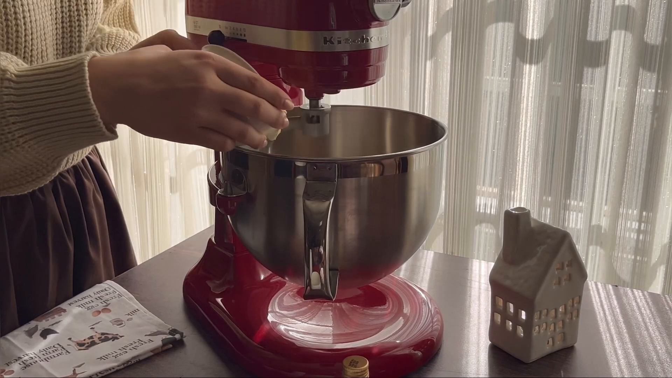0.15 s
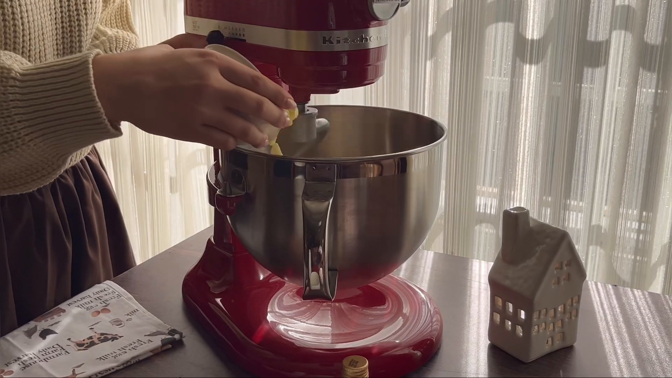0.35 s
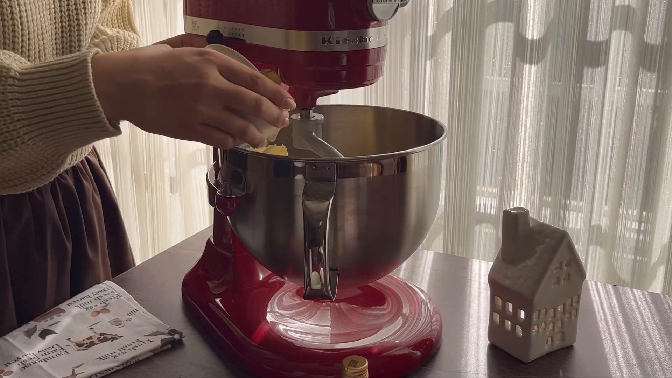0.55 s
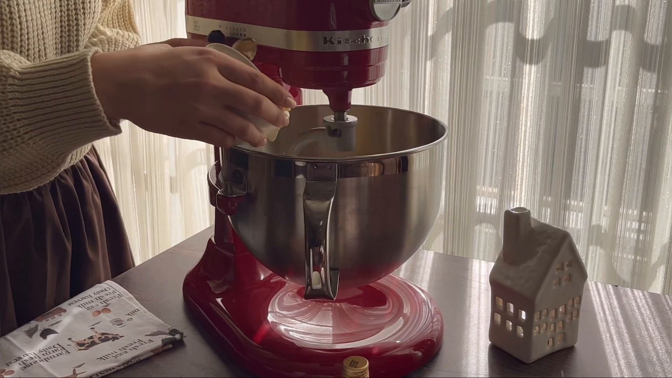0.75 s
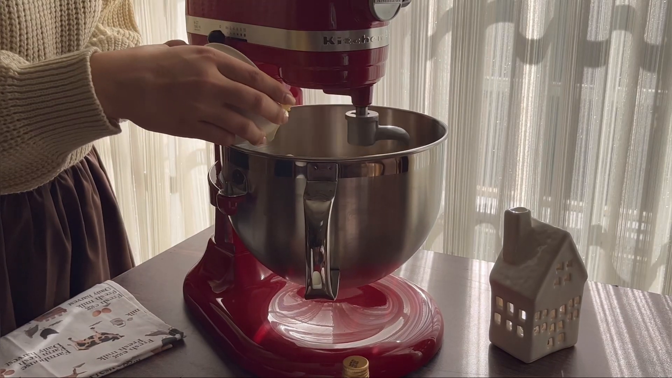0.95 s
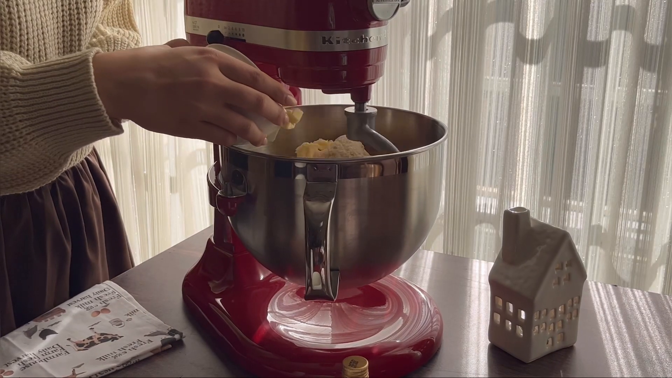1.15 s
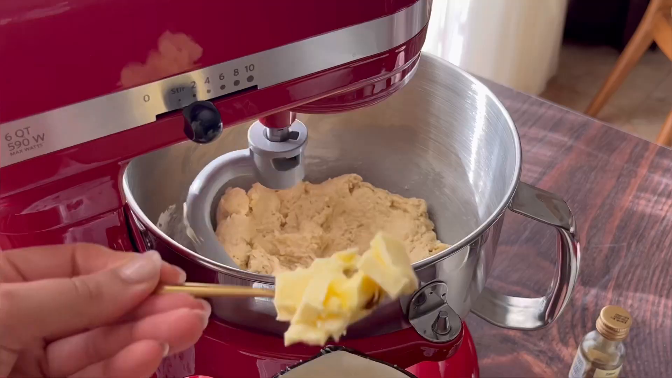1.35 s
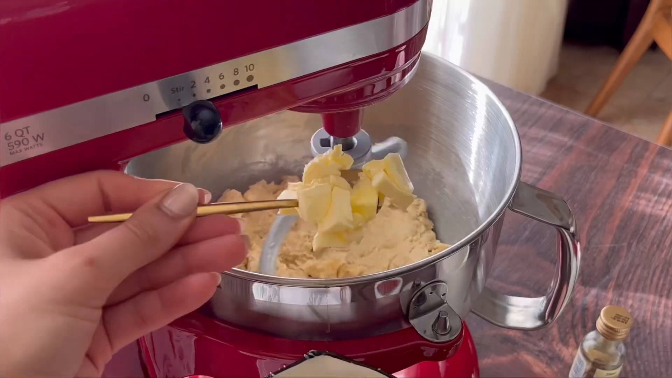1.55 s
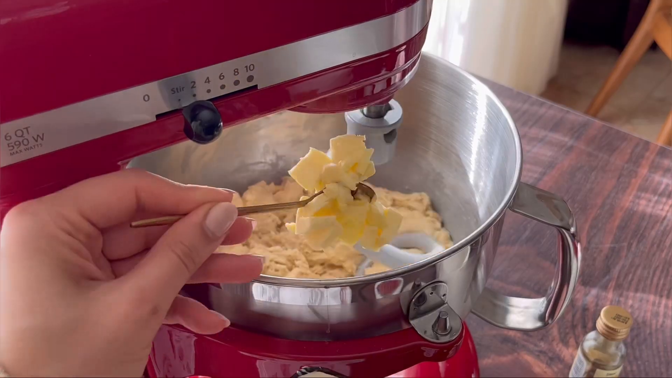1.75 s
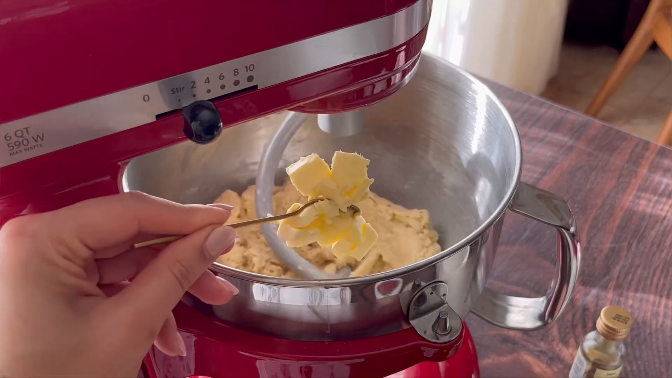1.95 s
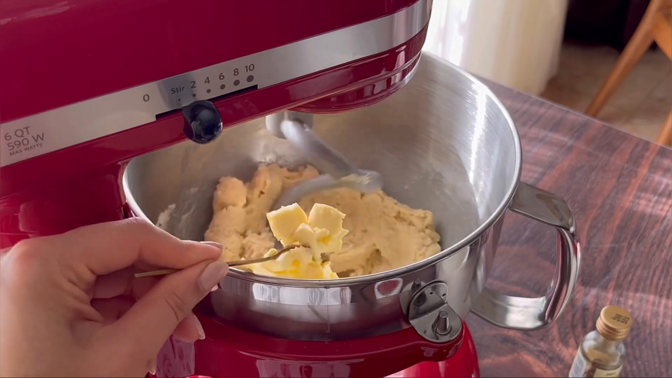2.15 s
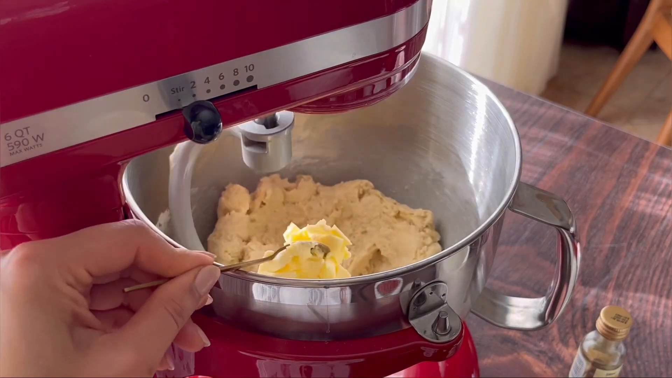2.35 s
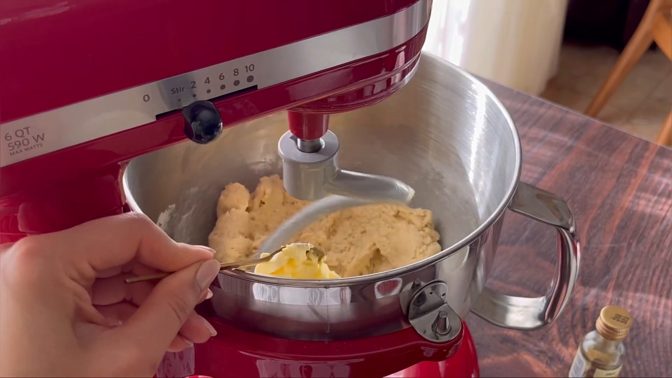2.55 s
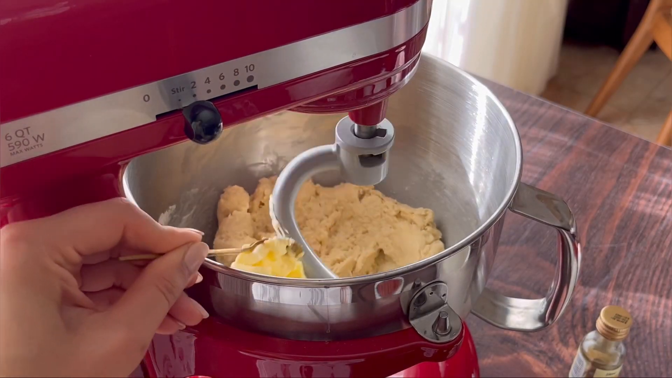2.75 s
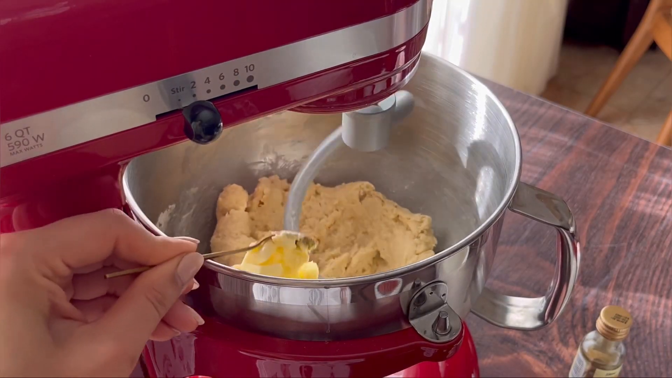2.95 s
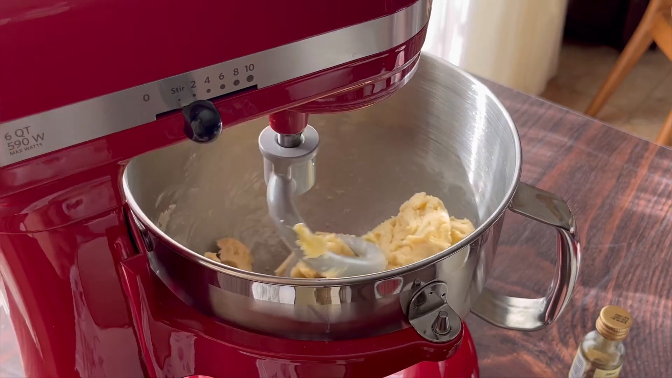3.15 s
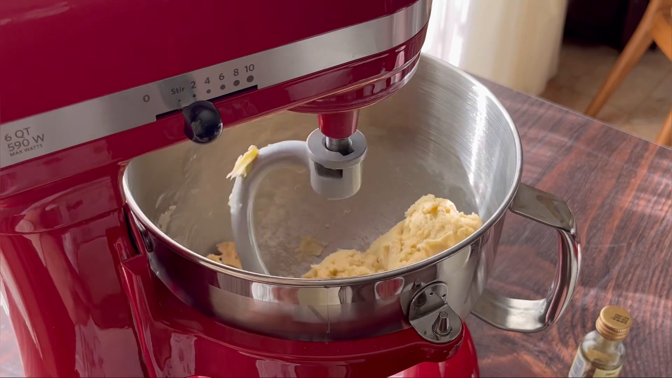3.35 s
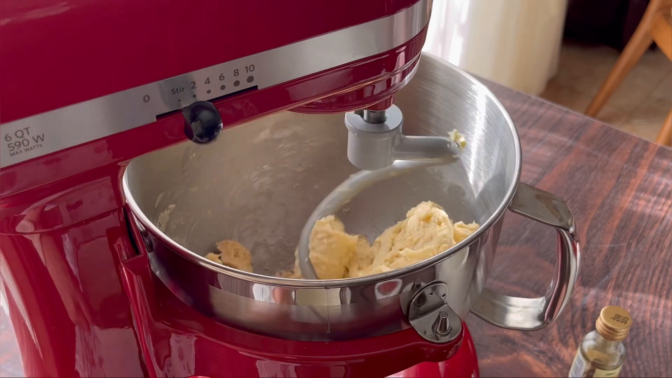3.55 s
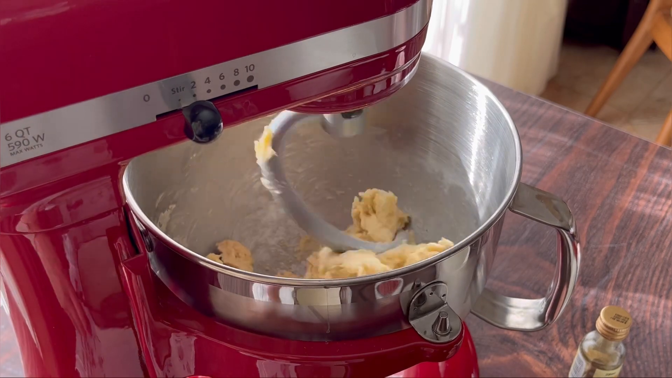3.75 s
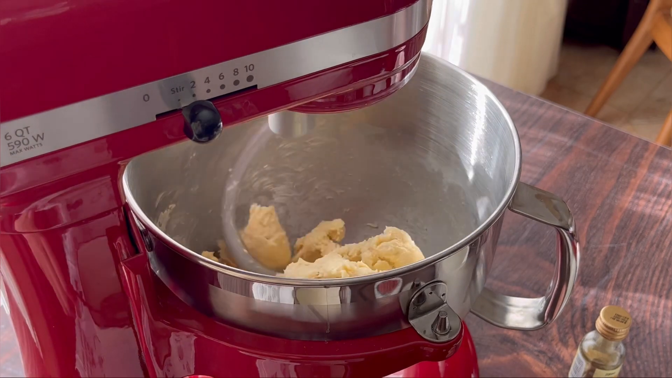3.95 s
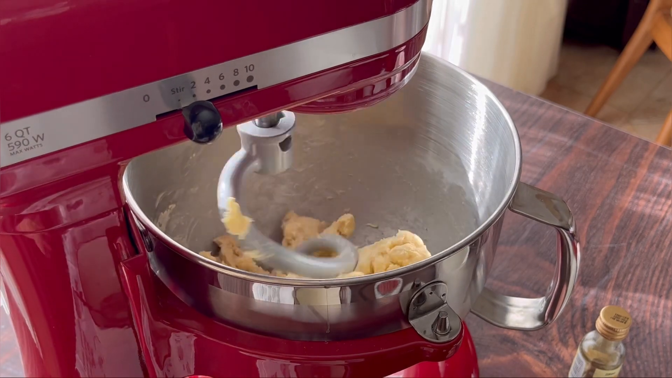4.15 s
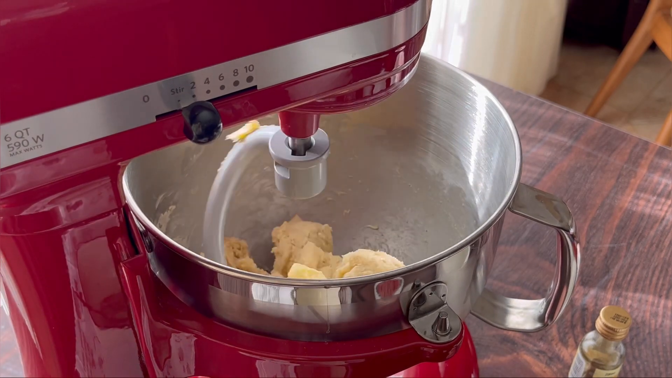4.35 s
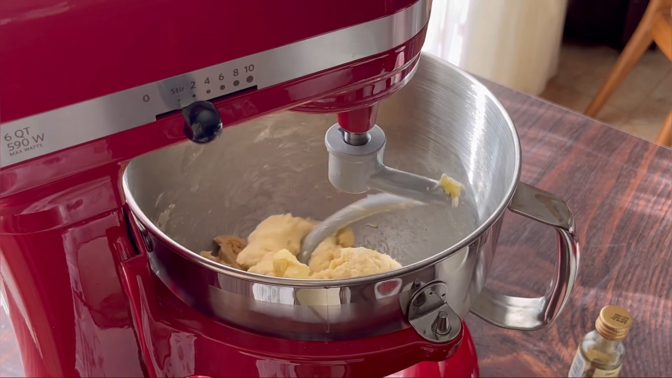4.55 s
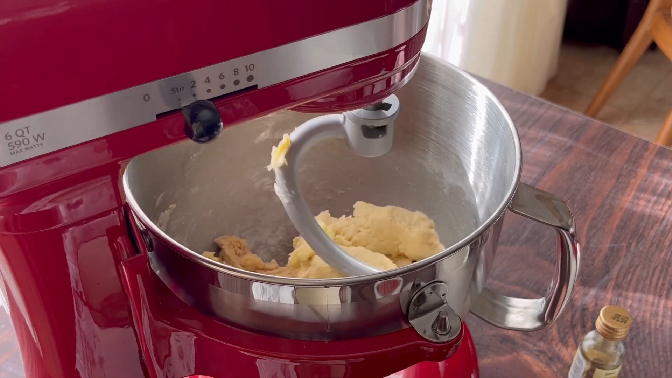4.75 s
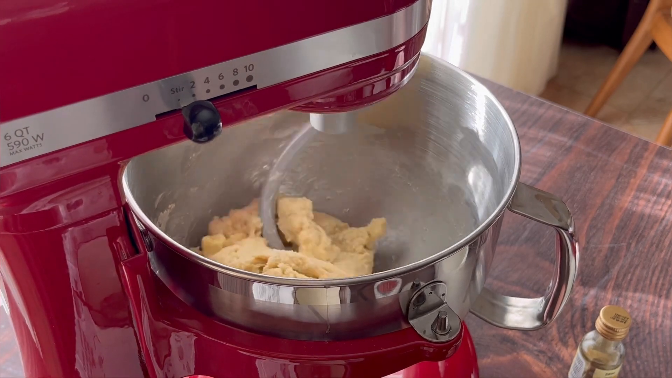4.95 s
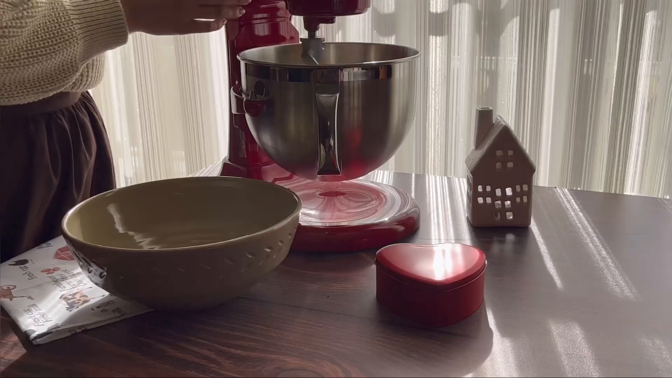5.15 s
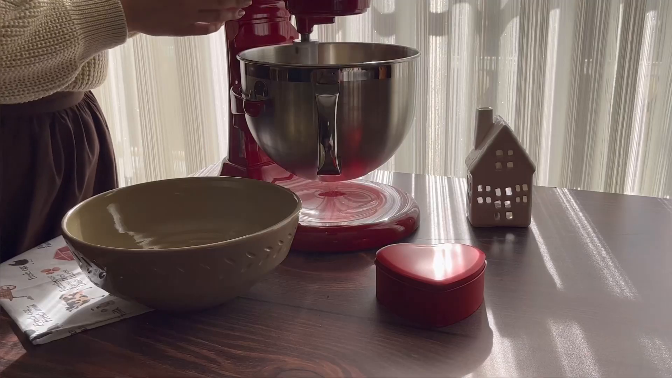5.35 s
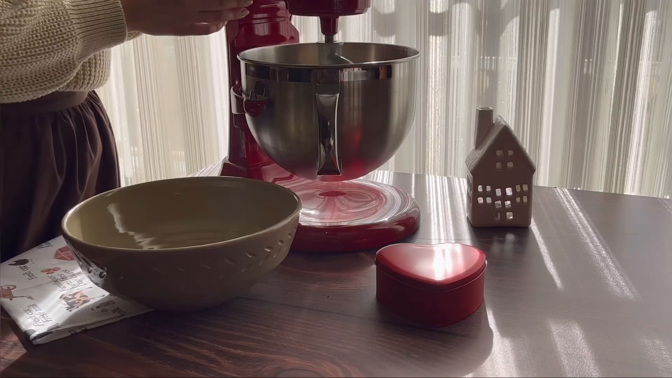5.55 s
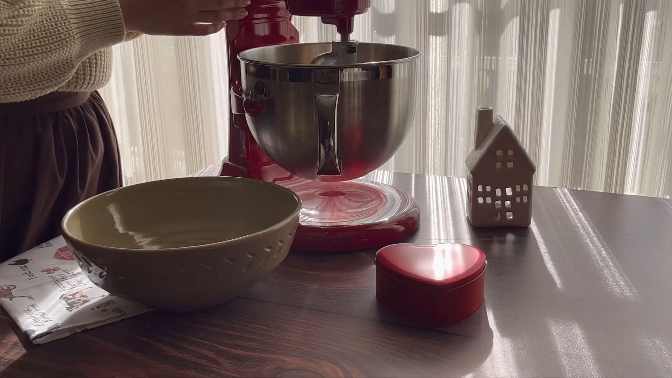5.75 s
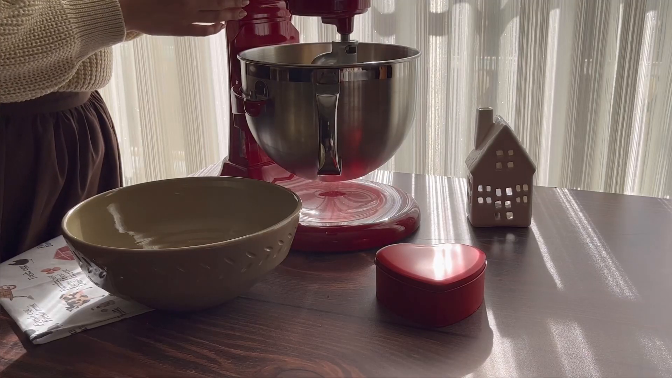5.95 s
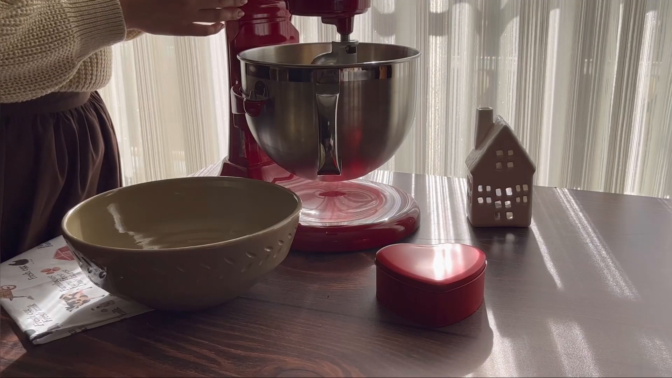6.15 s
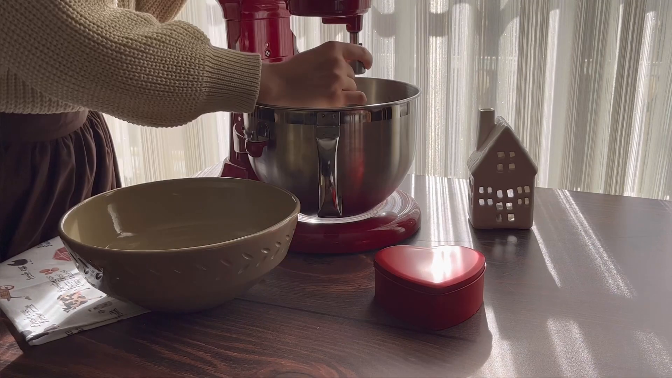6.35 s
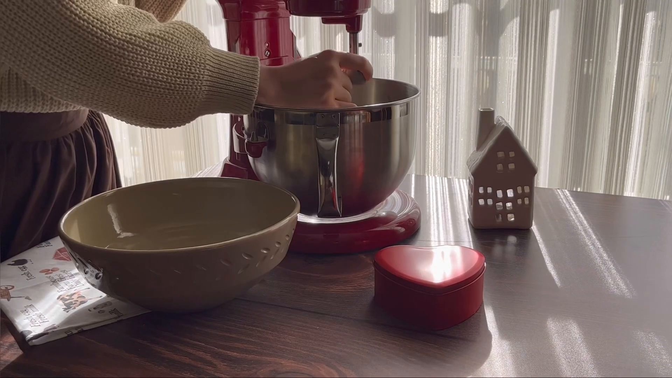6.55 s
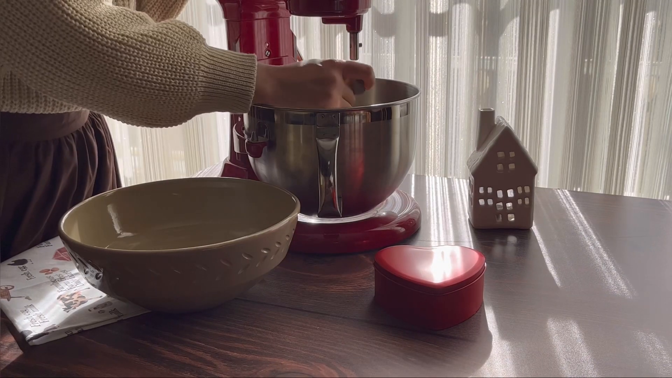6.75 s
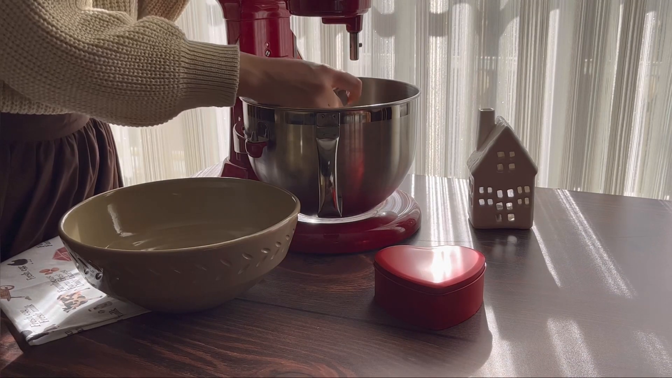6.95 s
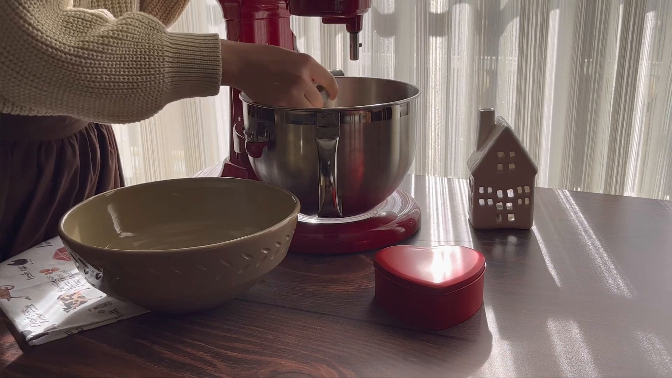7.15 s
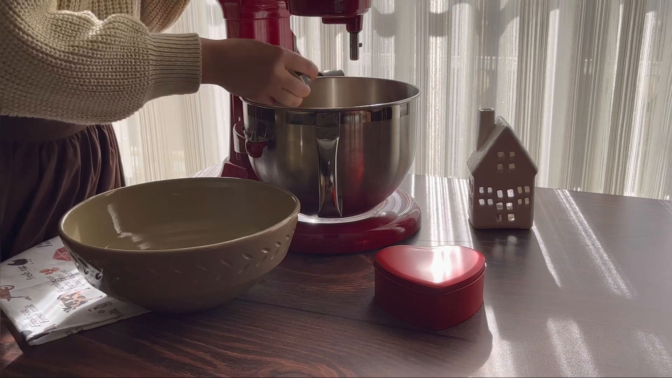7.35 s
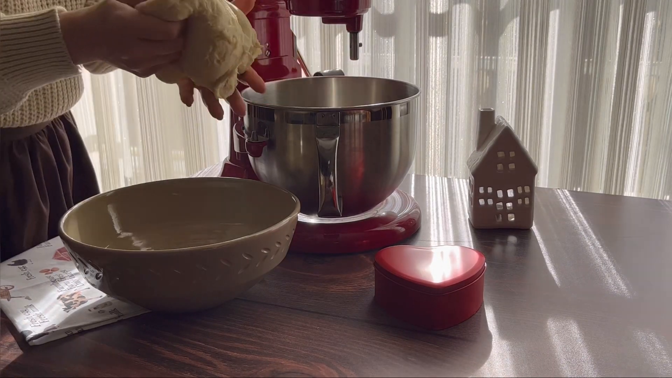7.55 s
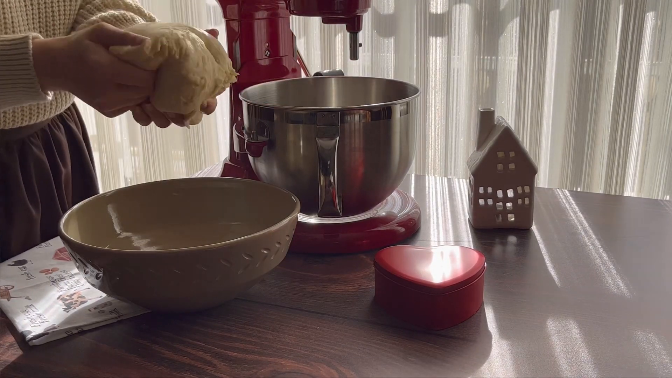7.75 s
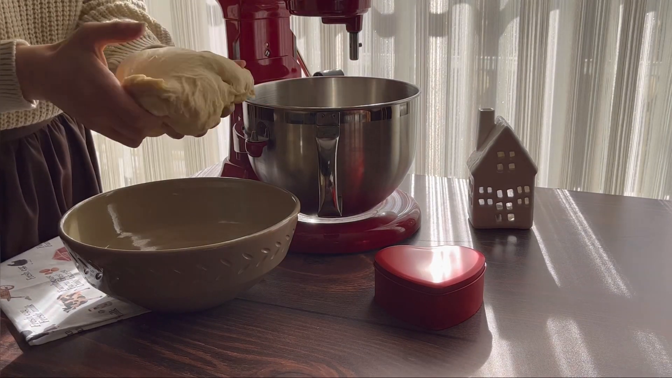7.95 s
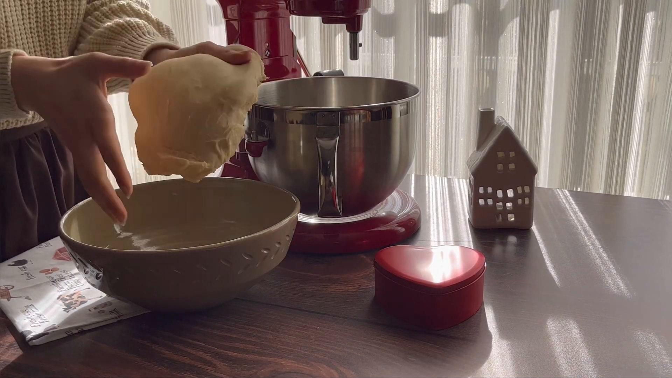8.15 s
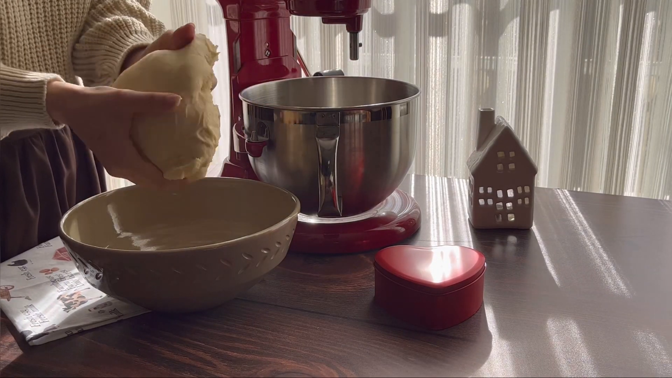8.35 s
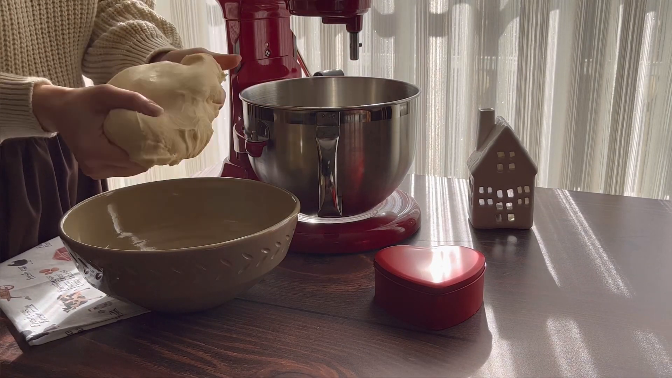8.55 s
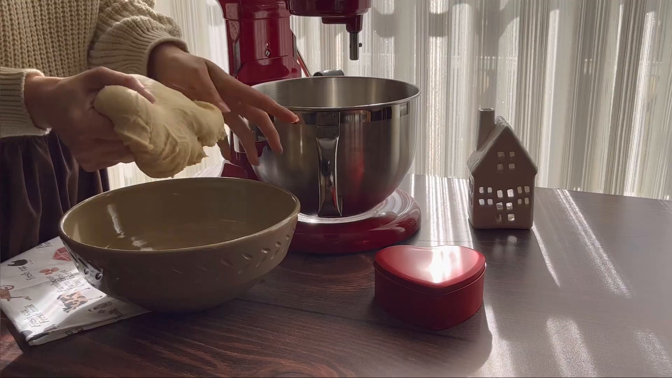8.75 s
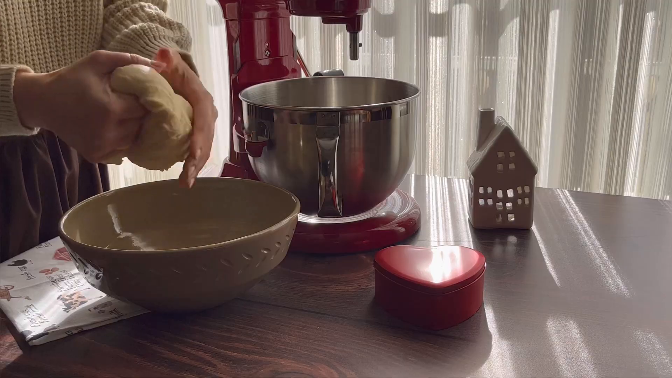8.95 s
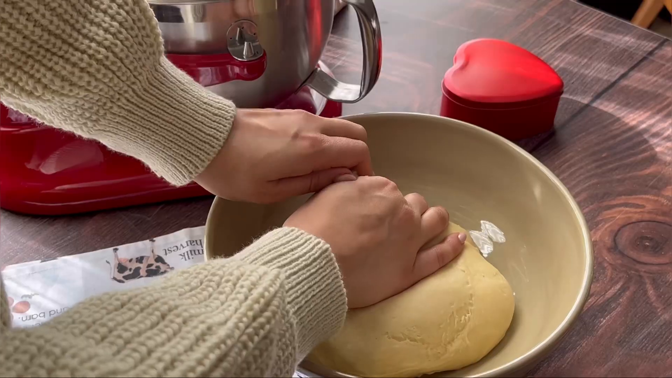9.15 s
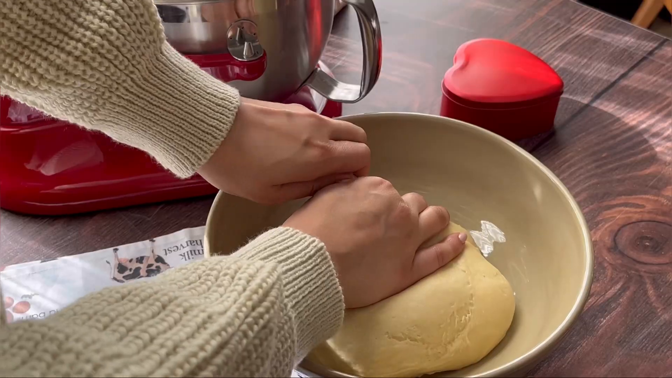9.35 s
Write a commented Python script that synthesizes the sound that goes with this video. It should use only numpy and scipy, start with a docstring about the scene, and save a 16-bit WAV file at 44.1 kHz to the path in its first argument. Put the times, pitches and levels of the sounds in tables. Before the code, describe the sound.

A stand mixer groans and rattles through stiff dough, a spoon taps the steel rim, it clicks off, then soft clanks and sticky handling in quiet.

```python
"""A stand mixer is heard kneading dough in a steel bowl: geared motor, loose rattle, hiss and a low hum.
Its pitch sags under load and recovers, computed as tooth blows and tones that excite resonances.
A spoon taps butter off on the rim; the speed lever snaps to off and the motor runs down.
The hook comes off its shaft with a soft clank and hands lift out the dough: shaped noise and ringing modes.
Diffuse echoes and a quiet kitchen lie behind, with rumble, appliance tones and a thin hiss."""
import sys
import numpy as np
from scipy import signal
from scipy.fft import rfft, irfft, next_fast_len
from scipy.io import wavfile
from scipy.ndimage import uniform_filter1d

SR = 44100
rng = np.random.default_rng(int(sys.argv[2]) if len(sys.argv) > 2 else 0)


def wav_out(sig):
    """Save sig, one row per channel (or a flat mono array), as 16-bit PCM at SR to the path in sys.argv[1]."""
    wavfile.write(sys.argv[1], SR, np.round(np.clip(np.atleast_2d(sig).T, -1, 1) * 32767).astype(np.int16))


N = 414094
T = np.arange(N) / SR  # time axis in seconds
MAINS_HZ = 50
OFF_S = 5.618  # the current is cut
FREE_MESH_HZ = 538  # tooth meshing rate when the hook runs free
GEAR_DB, RATTLE_DB, HISS_DB = -33.5, -44, -52  # base levels with the hook running free, before the trims
DULL_HZ, DULL_LOAD_DB = 6400, -14.5  # hiss under load: edge, and dB above it per share of speed lost
TOP_HZ = 16000

# Gear speed, sagging as the hook drags through dough. Each row: time in seconds, tooth meshing rate in Hz.
SPEED = [(0.0, 471.3), (0.12, 486.4), (0.25, 412.6), (0.37, 403.2), (0.44, 364.7), (0.53, 469),
         (0.59, 496.7), (0.78, 522), (0.95, 430.2), (1.05, 414), (1.32, 394.5), (1.39, 530.4),
         (1.46, 561.6), (1.54, 514.5), (1.74, 534.4), (1.87, 506), (2.01, 538.6), (2.11, 463.7),
         (2.24, 521.2), (2.62, 533.6), (2.73, 520), (2.81, 462.8), (2.85, 499), (3.01, 532.3),
         (3.18, 510.6), (3.26, 405.8), (3.32, 383.2), (3.48, 536.8), (3.54, 565.3), (3.62, 533),
         (3.74, 555), (3.82, 470.4), (4.02, 551.7), (4.13, 628.7), (4.2, 580.2), (4.27, 402.4),
         (4.38, 406.2), (4.48, 503), (4.73, 532.7), (4.8, 514.8), (4.9, 446.1), (4.98, 517.2), (5.02, 396),
         (5.08, 418.1), (5.21, 517.2), (5.6, 516)]
# Listening positions, each held until the next. Each row: start in seconds, gear level in dB,
# motor level in dB, left minus right in dB, low growl in dB, brush hiss in dB per share of speed lost.
PLACE = [(0, -3.5, -3.5, 0.5, 0.5, -16), (1.355, -0.76, 0.5, 1.25, -3.5, -1.5),
         (4.99, 1.4, -1, 0.5, -9, -8)]
# Resonances of the cast housing. Each row: centre in Hz, half the bandwidth of one pass in Hz, level in dB.
HOUSING = [(263, 60, -14), (399.4, 43, 2), (442.5, 65, 2), (569.5, 48, -2.5), (800, 140, -14),
           (1068, 90, -13), (1337, 45, -9), (1881, 280, -21.5)]
# Hardest pulls of the dough. Each row: centre in seconds, rise in dB, half length in seconds.
SURGES = [(0.254, 5, 0.043), (1.445, 6.5, 0.073), (1.88, 9.5, 0.044), (2.8, 4.5, 0.036), (2.926, 7, .025),
          (3.249, 17, 0.028), (3.385, 11, 0.038), (3.465, 13, 0.016), (4.264, 16, 0.031),
          (4.884, 10.5, 0.039), (5.046, 8, 0.038)]
# Brief gear squeaks. Each row: centre in seconds, level in dB, half length in seconds.
SQUEAKS = [(2.118, -39, .02), (4.134, -45.5, .03)]
# Spectrum of loose gear play. Each row: frequency in Hz, level in dB.
RATTLE_COLOUR = [(90, -15), (170, -17), (280, -3.5), (450, -1), (680, -1), (830, 0), (1100, -5.5),
                 (1500, -7), (2000, -11), (2500, -12), (4000, -17.5), (8000, -33.5)]
# Spectrum of the brushes. Each row: frequency in Hz, level in dB.
BRUSH_COLOUR = [(1200, -17), (2400, 6), (3300, 2.5), (4300, 7), (6000, -1.5), (7500, 1), (8500, -11),
                (10500, 1.5), (12500, -5), (14200, -13.5), (16000, -33)]
# Motor hum. Each row: multiple of the mains frequency, relative level in dB.
HUM = [(2, -23), (4, -17.5), (6, -29), (8, 2), (10, -12.5)]
# Modes of the steel bowl. Each row: frequency in Hz, level in dB, 60 dB decay time in seconds.
BOWL_MODES = [(1040, -9.5, .15), (4150, -1.5, 0.11), (4630, -2, .12), (5078, 1.5, 0.099), (6000, -6, .09),
              (6700, -6, .08), (9540, 0, .06)]
# Stiff dough moaning along the wall. Each row: start in seconds, length in seconds,
# start pitch in Hz, end pitch in Hz, level in dB.
MOANS = [(0.032, .36, 863, 739, -44), (0.231, 0.28, 704, 640, -41.5), (0.39, .3, 251, 265.3, -45.5),
         (0.78, .34, 414, 316.3, -46), (1.039, .35, 325.8, 263.4, -44.5)]
# Dough slapping the bowl. Each row: time in seconds (7 ms after onset), level in dB before a trim.
SLAPS = [(0.5, -37.5), (1.555, -29.5), (3.462, -31.5), (4.072, -26.5), (4.114, -30), (4.444, -32.5),
         (5.008, -35.5)]
# Buttery dough smearing on steel. Each row: centre in seconds, level in dB, half length in seconds.
SMEARS = [(1.58, -46.5, 0.0838), (4.084, -43, 0.037)]
# Spectrum of the smears. Each row: frequency in Hz, level in dB.
SMEAR_COLOUR = [(600, -20), (1600, -1), (2800, -11), (4500, 4), (6000, -12.5), (12000, -26)]
# Spoon on the rim. Each row: time in seconds, tick in dB, knock in dB, both before trims.
TAPS = [(0.9317, -35.5, -42), (2.3286, -18.5, -20.5), (2.526, -18, -15), (2.6883, -17, -14),
        (2.8826, -19.5, -24), (3.051, -15.5, -23)]
# Spectrum of the spoon ticks. Each row: frequency in Hz, level in dB.
TAP_COLOUR = [(1000, -34), (3000, -17), (3900, 3), (5500, -2), (7200, 3), (9000, -7.5), (11000, -3),
              (14000, -13), (16000, -28.5)]
# Spectrum of the duller knocks of the spoon. Each row: frequency in Hz, level in dB.
KNOCK_COLOUR = [(100, -9), (240, -2), (500, -16.5), (870, 7.5), (1200, 1.5), (1600, -5.5), (2100, -5.5),
                (2700, -12.5), (5500, -15.5), (11000, -18.5), (15000, -36)]
# Spectrum of the lever's snap. Each row: frequency in Hz, level in dB.
LEVER_COLOUR = [(200, -14.5), (900, -13.5), (2800, -9.5), (4400, 5.5), (6000, 3), (8000, 0.5), (11000, 3),
                (14000, -2), (16000, -25.5)]
# Hook against shaft and bowl. Each row: start in seconds, level in dB, rise in seconds,
# 60 dB decay time in seconds, top edge in Hz, ring in dB.
KNOCKS = [(6.436, -36.5, 0.022, 0.082, 8800, -2), (6.466, -35, .012, .115, 6980, -1.5),
          (6.624, -48, 0.004, 0.094, 2500, -2.5), (6.677, -43.5, .012, 0.14, 950, -5)]
# Spectrum of steel scraping on steel. Each row: frequency in Hz, level in dB.
SCRAPE_COLOUR = [(100, -12.5), (235, 0), (500, -6.5), (870, 5), (1200, 0.5), (1600, -6), (2100, 2.5),
                 (2700, -9), (5500, -14), (11000, -13), (15000, -35)]
# Modes of the hook. Each row: frequency in Hz, level in dB, 60 dB decay time in seconds.
HOOK_MODES = [(327, -9, .22), (447, 1, 0.15), (890, 0, 0.17), (1026, 6, 0.2), (1180, 9, 0.072),
              (1358, 2, 0.18), (2008, 10, 0.085), (2160, 11, 0.09), (2700, -0.5, 0.09), (3410, -4, 0.16),
              (4646, -6, 0.18), (5485, -2, 0.22)]
# Dry clicks of fingers and hook. Each row: start in seconds, level in dB, 60 dB decay time in seconds.
CLICKS = [(6.314, -59.5, .08), (8.899, -60.5, 0.034)]
# Spectrum of the clicks. Each row: frequency in Hz, level in dB.
CLICK_COLOUR = [(400, -12.5), (1100, 6), (2900, -1), (3900, -9), (5000, -27)]
# Sticky dough peeling off the fingers. Each row: centre in seconds, level in dB, half length in seconds.
PEELS = [(8.038, -68, 0.036), (8.38, -72.5, 0.042), (8.666, -72, .012), (8.703, -66, 0.016)]
# Spectrum of the peeling. Each row: frequency in Hz, level in dB.
PEEL_COLOUR = [(400, -14), (1800, 3), (3800, 0.5), (5100, 6.5), (7300, -1), (12000, 9), (15500, -8)]
# Dough pressed into a dish. The one row: centre in seconds, level in dB, half length in seconds.
PRESS = (9.125, -70.5, 0.059)
# Spectrum of the press. Each row: frequency in Hz, level in dB.
PRESS_COLOUR = [(300, 0), (900, 4), (2000, -2), (4000, -13), (7000, -28), (12000, -15), (15500, -25)]
# Decay of the room. Each row: frequency in Hz, 60 dB decay time in seconds.
ROOM_T60 = [(150, 1.32), (500, 0.65), (1500, 0.1643), (5000, 0.52), (12000, 0.22)]
# Width of the room. Each row: frequency in Hz, side minus mid in dB.
ROOM_WIDTH = [(100, -19), (400, -4.5), (900, 2.5), (2500, 0), (6000, 0.5), (8300, -55), (12000, -17.5)]
# Spectrum of the quiet kitchen. Each row: frequency in Hz, relative level in dB per Hz.
KITCHEN_COLOUR = [(15, -31), (25, -16), (71, -2), (103, 2), (231, -10.5), (326, -15), (488, -17),
                  (927, -34), (1810, -35), (4400, -44.5), (8320, -51), (12800, -36), (15000, -49)]
# Appliance tones. Each row: frequency in Hz, level in dB before a trim.
KITCHEN_TONES = [(48.4, -66), (96.9, -73.5), (436.0, -81), (489.9, -74)]
# Swell of the background noise. Each row: time in seconds, level in dB before a trim.
KITCHEN_DB = [(0, -58.5), (5.6, -60), (6.4, -61), (7.2, -62.5), (8.2, -63), (8.7, -59.5), (9.39, -58)]
# Two microphone ports. Each row: frequency in Hz, phase by which left leads in radians.
PORT_PHASE = [(1000, .1), (3000, .6), (5000, .3), (6600, -1), (8300, -3.14), (11500, -6.1), (13000, -7),
              (15000, -8.3)]


def mixer(gear_db=-4, groan_db=-4.5, rattle_db=-1, grind_db=-6.0, hiss_db=3.0, whine_db=-59.5,
          flutter_db=2, run_down_t60=.7, brush_t60=0.41, teeth_count=7, lumps_db=1):
    """Loaded drive: torque slows it, the gears groan, the brushes hush; without current it runs down."""
    mesh_hz = curves(SPEED)[0]
    load = 1 - mesh_hz / FREE_MESH_HZ  # share of speed lost
    near_gears, near_motor, _, growl_db, hush_db = place()
    lumps = lumps_db * walk(18)
    effort = undb(GEAR_DB + near_gears + lumps)
    play = undb(RATTLE_DB + near_gears + lumps)
    hiss = undb(HISS_DB + hush_db * load + near_motor)
    coast, current = fade(T - OFF_S, run_down_t60), fade(T - OFF_S, brush_t60)
    mesh_hz = mesh_hz * (1 + coast ** .4) / 2  # falls towards half speed as the sound dies
    # the dough tugs at the hook, so the gears behind it run less evenly than the motor
    tugged_hz = mesh_hz * (1 + .01 * walk(35))
    shaft_turns = np.cumsum(tugged_hz * (1 + .025 * walk(250))) / SR / teeth_count
    meshing = undb(gear_db) * gears(tugged_hz, shaft_turns)
    meshing = meshing + undb(groan_db) * current * groan(tugged_hz, load, growl_db)
    loose = undb(rattle_db) * rattle(shaft_turns) + undb(grind_db) * grind(mesh_hz)
    squeal = undb(whine_db + flutter_db * walk(70)) * whine(mesh_hz)
    motor = hiss * undb(hiss_db) * shelf(brushes(), DULL_HZ, DULL_LOAD_DB * load) + squeal
    return coast * (effort * meshing + play * loose) + current * motor


def gears(mesh_hz, shaft_turns, scatter=0.94, wear_db=0.0, grind_db=-3):
    """Impact excitation: teeth strike with uneven force, worn surfaces add sidebands, the housing rings."""
    teeth_passed = np.cumsum(mesh_hz * (1 + .02 * walk(70))) / SR
    when = np.interp(np.arange(1, int(teeth_passed[-1])), teeth_passed, np.arange(N))
    size = 1 + scatter * rng.standard_normal(len(when))
    # share each blow between the two nearest samples
    index, part = when.astype(int), when % 1
    early = np.bincount(index, size * (1 - part), N + 1)
    late = np.bincount(index + 1, size * part, N + 1)
    blows = (early + late)[:N]
    drive = unit(blows - blows.mean()) + undb(wear_db) * wear(shaft_turns) + undb(grind_db) * noise()
    out = 0
    # each resonance acts twice, with alternating sign, which leaves dark valleys between them
    for k, (hz, width, db) in enumerate(HOUSING):
        b, a = signal.iirpeak(hz, hz / (2 * width), fs=SR)
        twice = signal.lfilter(b, a, signal.lfilter(b, a, drive))
        out = out + (-1) ** k * undb(db) * twice
    return unit(out)


def wear(shaft_turns, change_rate=5, size=256, count=3):
    """Periodic roughness: uneven surfaces recur every shaft turn, giving dense overtones that glide."""
    position = shaft_turns * size % size
    out = 0
    for _ in range(count):
        surface = rng.standard_normal(size)
        out = out + np.interp(position, np.arange(size), surface) * walk(change_rate)
    return unit(out)


def groan(mesh_hz, load, growl_db, rough=.55, octave_db=-8.5, octave_surge=.65):
    """Mesh tone under load: it surges with the pull, over a wavering octave and a lower growl."""
    phase = 2 * np.pi * np.cumsum(mesh_hz * (1 + .013 * walk(110))) / SR
    surge_db = sum(db * np.exp(-((T - s) / half) ** 2) for s, db, half in SURGES)
    # a surging tone is smoother
    tone = undb(surge_db) * np.sin(phase) * (1 + rough * undb(-surge_db) * walk(60))
    octave = undb(2 * walk(14)) * rasp(2 * mesh_hz, 90, .017)
    growl = np.sin(.75 * phase) * (1 + .7 * walk(70))
    lower = undb(growl_db) * np.maximum(load, 0) * growl
    return tone + undb(octave_db + octave_surge * surge_db) * octave + lower


def rattle(shaft_turns, chatter_db=3.5, lumpy_db=1.7, pulsing=.35):
    """Backlash: play in the gears chatters in uneven bursts, pushed by torque at twice the mains rate."""
    torque = 1 + pulsing * np.cos(4 * np.pi * MAINS_HZ * T)
    bursts = undb(chatter_db * walk(110) + lumpy_db * walk(22)) * torque
    return unit(colour((wear(shaft_turns) + noise()) * bursts, RATTLE_COLOUR))


def grind(mesh_hz, centre_hz=1650, width_hz=520):
    """Resonance: crowded gear overtones flare in short, rough lumps within a broad band of the head."""
    out = 0
    for order in np.arange(9, 18) / 4:  # multiples of the mesh rate
        hz = order * mesh_hz
        lumps = np.clip(walk(75) + .35, 0, 2) ** 1.3
        out = out + lumps * rasp(hz, 280, .024) / (1 + ((hz - centre_hz) / width_hz) ** 4)
    return unit(out)


def brushes(flicker_db=1, bowl_db=-15):
    """Sliding friction: brushes hiss on the commutator and keep the bowl ringing faintly."""
    hiss = noise() * undb(flicker_db * walk(30))
    return unit(colour(hiss, BRUSH_COLOUR) + undb(bowl_db) * ring(hiss, BOWL_MODES))


def whine(mesh_hz, centre_hz=5850, width_hz=300, follow=.75, inertia_s=.07):
    """Inertia: the heavy rotor follows sags in part; its wavering overtones pass through a resonance."""
    followed_hz = FREE_MESH_HZ + follow * (mesh_hz - FREE_MESH_HZ)
    rotor_hz = uniform_filter1d(followed_hz, int(inertia_s * SR))
    out = 0
    for order, share in ((11, 1), (11.5, .6)):
        hz = order * rotor_hz
        resonance = 1 / (1 + ((hz - centre_hz) / width_hz) ** 4)
        out = out + share * rasp(hz, 500, .006) * undb(3 * walk(25)) * resonance
    return unit(out)


def hum(db=-41, waver_db=3.5, wander=.35, apart=0.22, hum_t60=0.66):
    """Magnetic forces: chopped current shakes the motor at even mains multiples, out of step at the ports."""
    lead = np.array([[apart], [-apart]])  # radians, left and right
    tones = 0
    for multiple, rel_db in HUM:
        level = undb(rel_db + waver_db * walk(26))
        phase = 2 * np.pi * multiple * MAINS_HZ * T + wander * walk(18)
        tones = tones + level * np.sin(phase + lead)
    return undb(db + place()[1]) * fade(T - OFF_S, hum_t60) * unit(tones)


def squeaks(blur=.015):
    """Binding teeth: for a moment they sing at three and four times the mesh rate."""
    mesh_hz = curves(SPEED)[0]
    return sum(swell(*row) for row in SQUEAKS) * (rasp(3 * mesh_hz, 200, blur) + rasp(4 * mesh_hz, 200, blur))


def moans(blur=.025):
    """Stick-slip: dough dragged along steel gives rough tones that swell, glide and fade."""
    out = 0
    for s, length, start_hz, end_hz, db in MOANS:
        part = np.clip((T - s) / length, 0, 1)
        hz = start_hz + part * (end_hz - start_hz)
        out = out + undb(db) * np.sin(np.pi * part) * rasp(hz, 200, blur)
    return out


def dough(slap_db=-3, slap_t60=0.074, grain_db=2):
    """Damped contact: soft, wet slaps and smears against the bowl wall are broad noise."""
    slaps = sum(contact(s - .007, db + slap_db, 0.015, slap_t60) for s, db in SLAPS)
    smears = sum(swell(*row) for row in SMEARS) * noise() * undb(grain_db * walk(200))
    return colour(slaps, RATTLE_COLOUR) + colour(smears, SMEAR_COLOUR)


def thump(db=-34, low_hz=52, high_hz=97, t60=0.18):
    """Structure-borne sound: one heavy lump of dough thumps through the table as two decaying low tones."""
    t = np.maximum(T - 3.35, 0)
    envelope = np.minimum(t / 0.0225, 1) * fade(t - .03, t60)
    tones = np.sin(2 * np.pi * low_hz * t) + .5 * np.sin(2 * np.pi * high_hz * t)
    return undb(db) * envelope * tones


def spoon(crack_db=13, tick_db=-1, tick_t60=0.04, bowl_db=-11, body_db=-12, body_t60=0.087):
    """Impact on a shell: a bright rim tick, a short bowl ring and a duller knock that rises more slowly."""
    ticks = sum(crack(s, db + crack_db) + contact(s, db + tick_db, 0.00025, tick_t60) for s, db, _ in TAPS)
    body = sum(contact(s, db + body_db, 0.0036, body_t60) for s, _, db in TAPS)
    return colour(ticks, TAP_COLOUR) + undb(bowl_db) * ring(ticks, BOWL_MODES) + colour(body, KNOCK_COLOUR)


def lever(crack_db=5.5, snap_db=-8, snap_t60=0.018, body_db=-25, body_t60=0.089):
    """Impulse and response: the speed lever snaps home and the housing answers."""
    snap = crack(OFF_S, crack_db) + contact(OFF_S, snap_db, 0.00036, snap_t60)
    body = contact(OFF_S, body_db, 0.0089, body_t60)
    return colour(snap, LEVER_COLOUR) + colour(body, RATTLE_COLOUR)


def hook(scrape_db=-3):
    """Filtered collisions: the hook scrapes off its pin, bumps the bowl; each has its brightness and ring."""
    blows, ringing = 0, 0
    for s, db, rise, t60, top_hz, ring_db in KNOCKS:
        low_pass = signal.butter(2, min(top_hz, SR / 3), fs=SR, output="sos")
        blow = signal.sosfilt(low_pass, contact(s, db, rise, t60))
        blows = blows + blow
        ringing = ringing + undb(ring_db) * blow
    return undb(scrape_db) * colour(blows, SCRAPE_COLOUR) + ring(ringing, HOOK_MODES)


def hands(clump_db=3, grain_db=3, press_crackle_db=-7, threads_per_s=1400):
    """Adhesion: damped clicks on metal, clustered snaps of dough threads, then a soft, sticky press."""
    clicks = sum(contact(s, db, 0.00063, t60) for s, db, t60 in CLICKS)
    snaps = unit((rng.random(N) < threads_per_s / SR) * noise() * undb(clump_db * walk(160)))
    peel_level = sum(swell(*row) for row in PEELS) + undb(press_crackle_db) * swell(*PRESS)
    peeling = colour(peel_level * snaps, PEEL_COLOUR)
    press = swell(*PRESS) * noise() * undb(grain_db * walk(200))
    return colour(clicks, CLICK_COLOUR) + peeling + colour(press, PRESS_COLOUR)


def room(x, size=32768):
    """Diffuse reverberation: noise decays by octave band, with frequency-dependent width between sides."""
    t, hz = T[:size], np.fft.rfftfreq(size, 1 / SR)
    centres = 125 * 2. ** np.arange(8)  # octave bands in Hz
    white, tail = rfft(rng.standard_normal((2, size))), 0
    for centre, share in zip(centres, np.eye(len(centres))):
        band = irfft(white * at(np.transpose([centres, share]), hz))
        tail = tail + band * fade(t, at(ROOM_T60, centre))
    tail = tail * np.clip((t - .003) / 0.0045, 0, 1)  # the echoes build up after 3 ms
    mid, side = tail / np.linalg.norm(tail[0])
    side = irfft(rfft(side) * undb(at(ROOM_WIDTH, hz)))
    return np.array([signal.oaconvolve(x, response)[:N] for response in (mid + side, mid - side)])


def kitchen(noise_db=-1, tone_db=-2, side_db=-13, sway_db=1):
    """Ambient noise: low rumble and thin hiss swell together over faint, wavering appliance tones."""
    mid, side = (unit(colour(noise(), KITCHEN_COLOUR)) * undb(sway_db * walk(4.1)) for _ in range(2))
    tones = 0
    for hz, db in KITCHEN_TONES:
        phase = 2 * np.pi * hz * T + .6 * walk(2.7)
        tones = tones + np.sqrt(2) * undb(db + tone_db) * np.sin(phase)
    level = undb(curves(KITCHEN_DB)[0] + noise_db)
    return level * (mid + undb(side_db) * np.array([side, -side])) + tones


def place(glide_s=0.013):
    """Listening position: gear level, motor level, balance, growl and hush are held, with short glides."""
    rows = np.array(PLACE)
    held = rows[np.searchsorted(rows[1:, 0], T), 1:]
    return uniform_filter1d(held, int(glide_s * SR), axis=0).T


def rasp(hz, blur_rate, blur):
    """Random modulation: fast shaking of pitch and strength turns a tone into a narrow, rough band."""
    phase = 2 * np.pi * np.cumsum(hz * (1 + blur * walk(blur_rate))) / SR
    return np.sin(phase) * (1 + .5 * walk(blur_rate / 2))


def contact(s, db, rise, t60):
    """Multiple impacts: a burst of fine collisions builds up and dies away."""
    out, start = np.zeros(N), int(s * SR)
    t = T[:min(SR // 2, N - start)]
    envelope = np.minimum(t / rise, 1) ** 2 * fade(t - rise, t60)
    out[start:start + len(t)] = undb(db) * envelope * rng.standard_normal(len(t))
    return out


def crack(s, db):
    """Unit impulse: the single hard instant of a contact."""
    return undb(db) * (np.arange(N) == int(s * SR))


def swell(s, db, half):
    """Gaussian envelope: level rises and falls smoothly, down to 1/e at the half length."""
    return undb(db) * np.exp(-((T - s) / half) ** 2)


def ring(x, modes):
    """Modal superposition: a sound drives a set of decaying sine modes."""
    t = T[:SR // 2]
    response = sum(undb(db) * fade(t, t60) * np.sin(2 * np.pi * hz * t) for hz, db, t60 in modes)
    return through(x, response)


def fade(t, t60):
    """Exponential decay: 60 dB down after t60."""
    return np.exp(-np.log(1000) * np.maximum(t, 0) / t60)


def colour(x, points, size=8192):
    """Minimum phase: a causal filter with the given spectrum follows from its folded cepstrum."""
    cepstrum = irfft(np.log(undb(at(points, np.fft.rfftfreq(size, 1 / SR)))))
    return through(x, irfft(np.exp(rfft(2 * cepstrum[:size // 2], size))))


def through(x, response):
    """Convolution: a sound passes through an impulse response of unit energy."""
    return signal.oaconvolve(x, response / np.linalg.norm(response))[:N]


def shelf(x, edge_hz, db):
    """Shelving filter: the treble above an edge is turned up or down."""
    low = signal.sosfiltfilt(signal.butter(2, min(edge_hz, SR / 3), fs=SR, output="sos"), x)
    return low + undb(db) * (x - low)


def noise():
    """White noise: equal power per Hz, rms 1."""
    return rng.standard_normal(N)


def walk(rate):
    """Low-pass randomness: steps at a rate in Hz, smoothed twice, wander with rms 1."""
    k = int(SR / rate)
    steps = np.repeat(rng.standard_normal(N // k + 1), k)
    return unit(uniform_filter1d(uniform_filter1d(steps, k), k)[:N])


def curves(rows):
    """Linear interpolation: each column of a timed table at every sample."""
    s, *columns = np.transpose(rows)
    return [np.interp(T, s, c) for c in columns]


def at(points, hz):
    """Logarithmic pitch scale: a spectrum is read on a log-frequency axis."""
    f, value = np.transpose(points)
    return np.interp(np.log(np.maximum(hz, 1)), np.log(f), value)


def unit(x):
    """Normalisation: scale to rms 1."""
    return x / np.sqrt(np.mean(x ** 2))


def undb(db):
    """Level law: decibels to amplitude gain."""
    return 10 ** (np.asarray(db) / 20)


def scene(direct_db=-2, machine_room_db=-8, click_room_db=-15, hook_room_db=-10):
    """Superposition: direct sounds, their echoes and hum share a balance; thump and kitchen are added."""
    machine = mixer() + squeaks() + moans() + dough()
    clicks = spoon() + lever()
    handling = hook() + hands()
    to_room = undb(machine_room_db) * machine + undb(click_room_db) * clicks + undb(hook_room_db) * handling
    table = undb(direct_db) * (machine + clicks + handling) + room(to_room) + hum()
    pan_db = place()[2]
    balance = undb(np.array([pan_db, -pan_db]) / 2)
    return table * balance + thump() + kitchen()


def record(dry):
    """Phase difference: the two ports differ in phase, mostly in the treble; the top is cut."""
    size = next_fast_len(N + SR // 10)
    lead = at(PORT_PHASE, np.fft.rfftfreq(size, 1 / SR))
    turned = rfft(dry, size) * np.exp(.5j * np.array([lead, -lead]))
    heard = irfft(turned, size)[:, :N]
    return signal.sosfilt(signal.ellip(8, .2, 70, TOP_HZ, fs=SR, output="sos"), heard)


dry = scene()
out = record(dry)
wav_out(out)
```